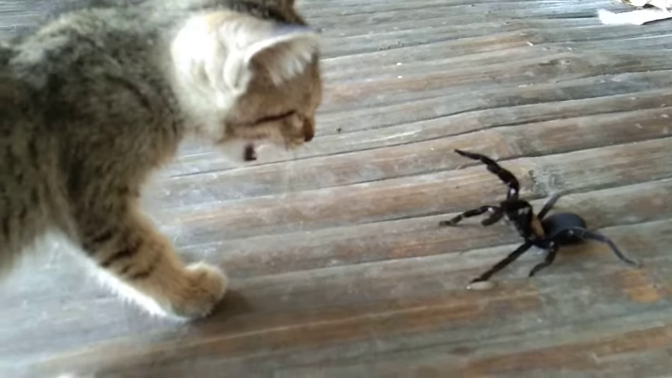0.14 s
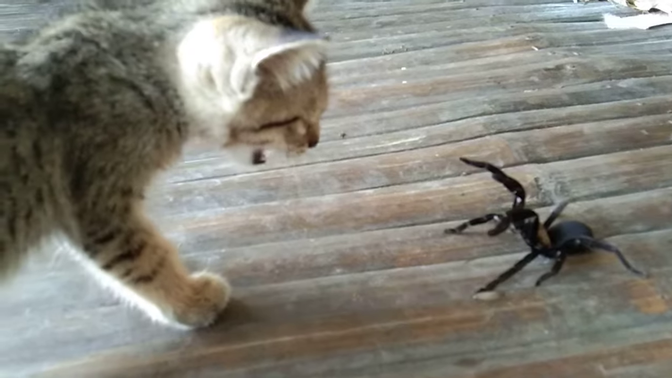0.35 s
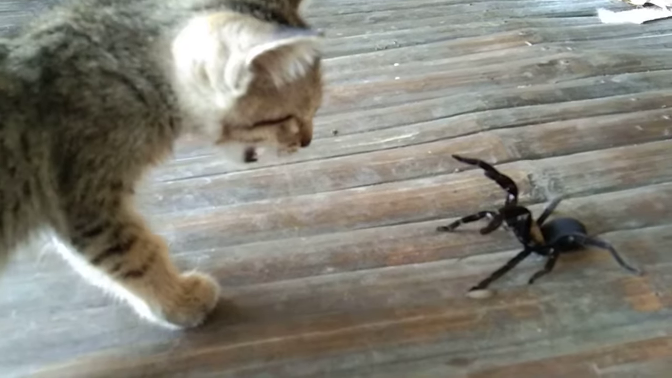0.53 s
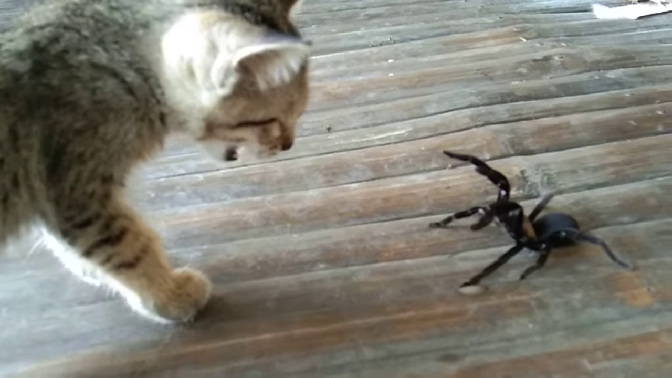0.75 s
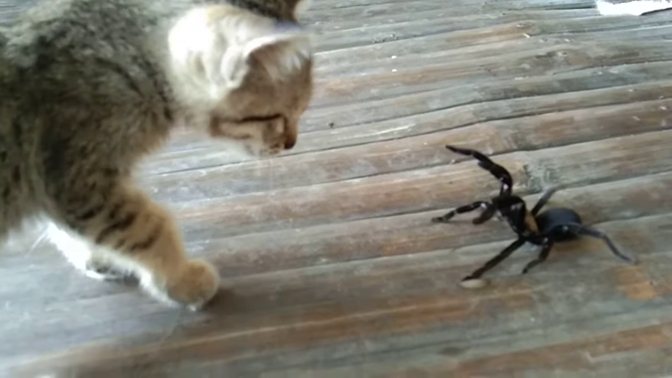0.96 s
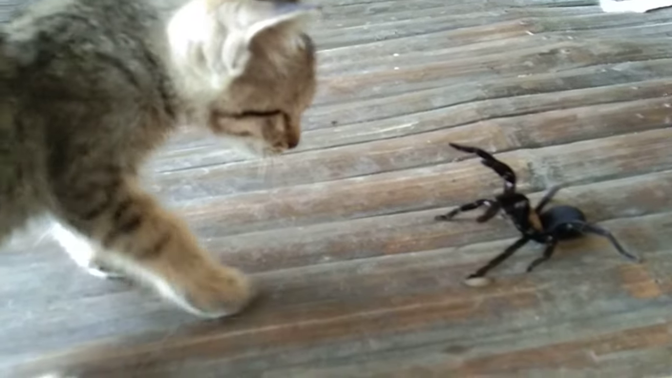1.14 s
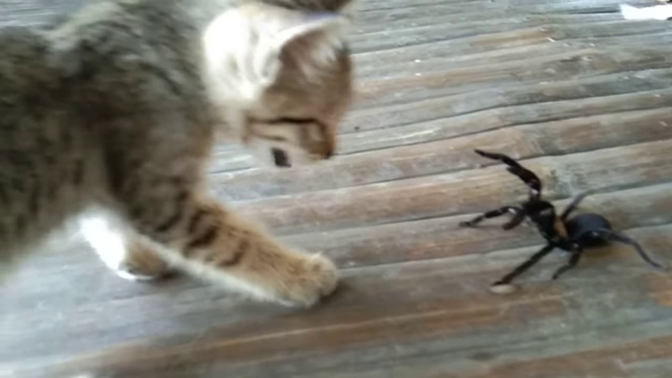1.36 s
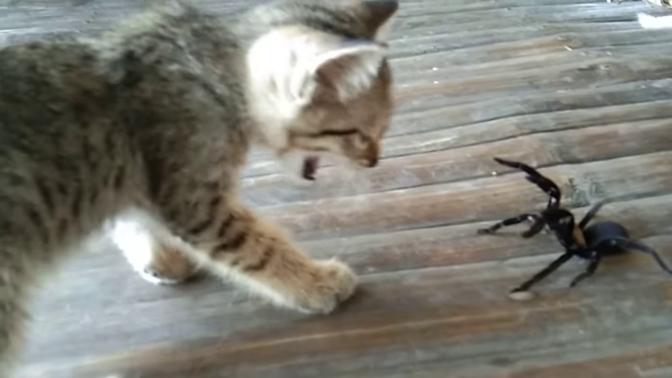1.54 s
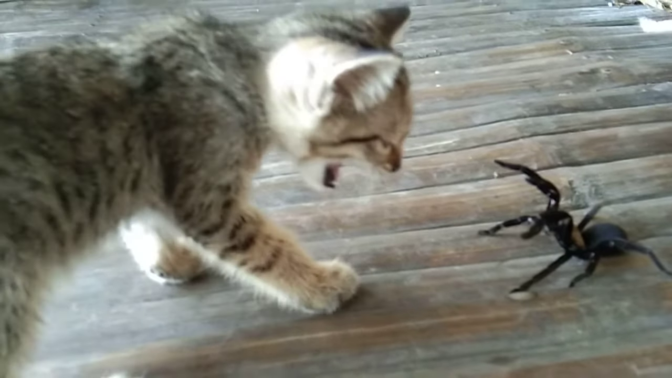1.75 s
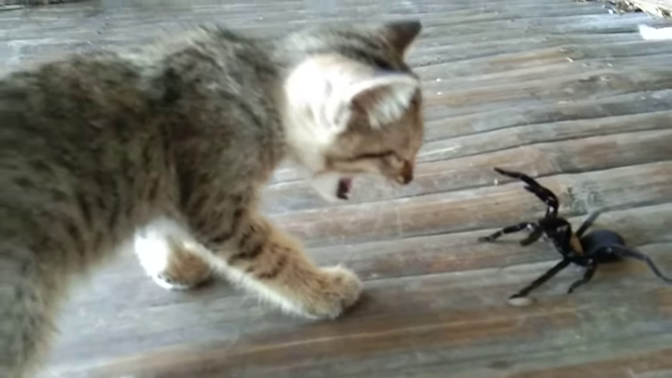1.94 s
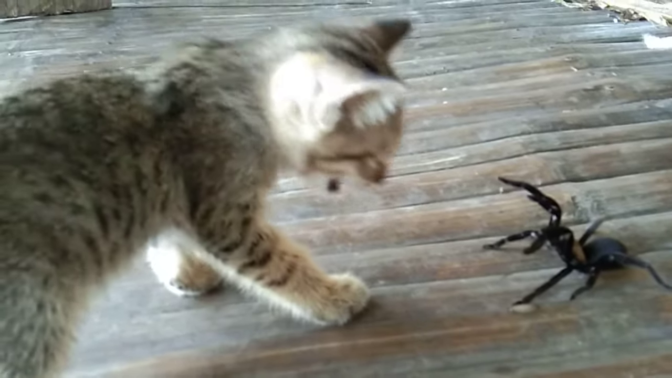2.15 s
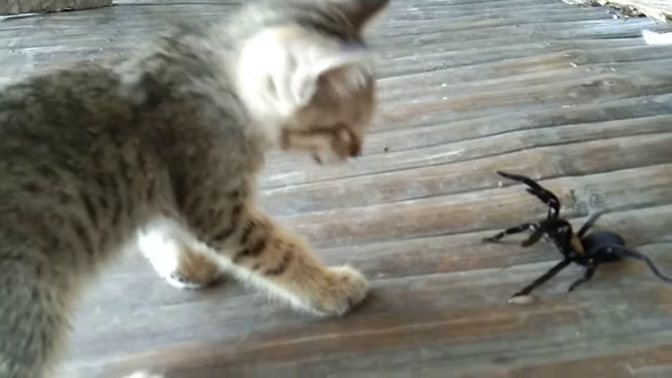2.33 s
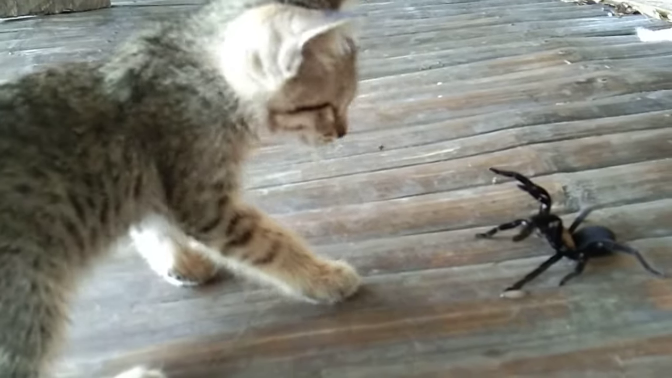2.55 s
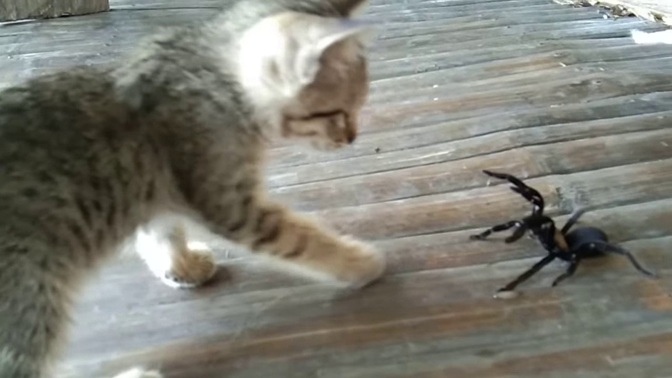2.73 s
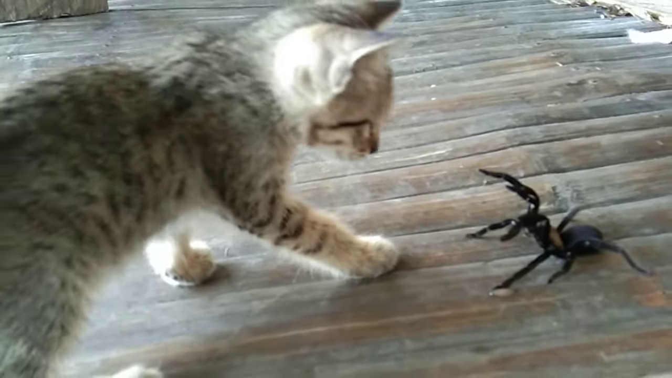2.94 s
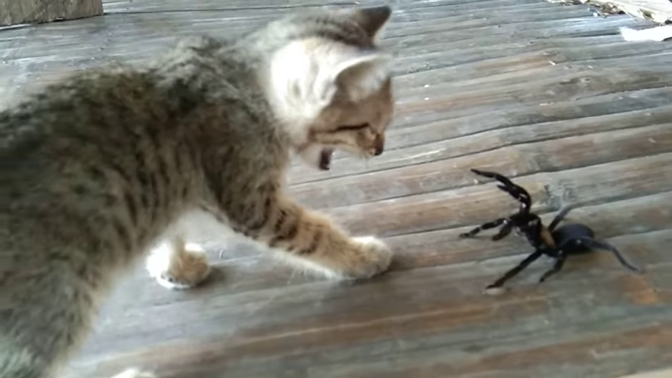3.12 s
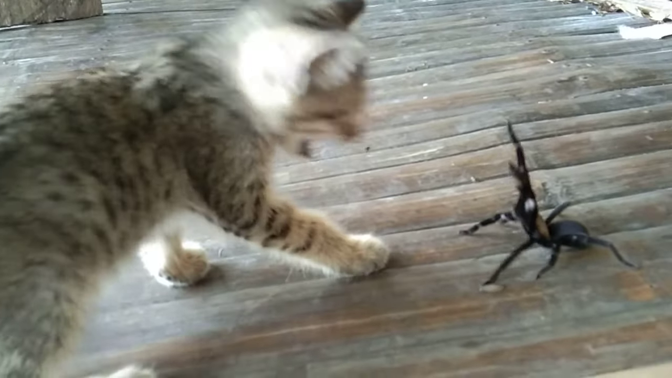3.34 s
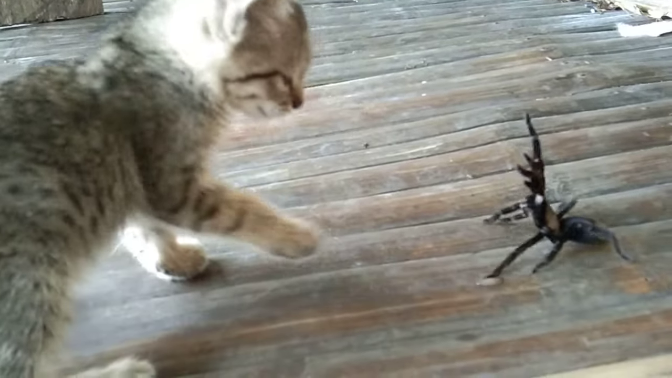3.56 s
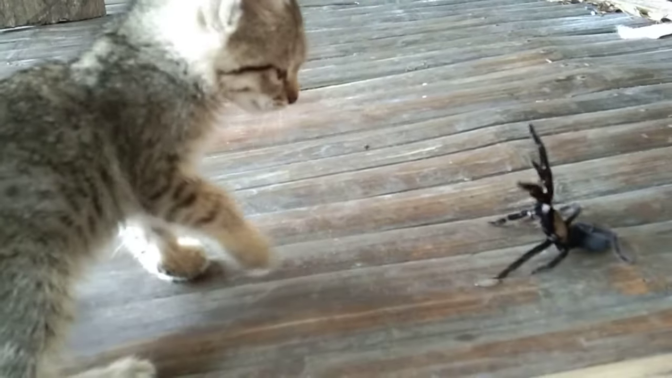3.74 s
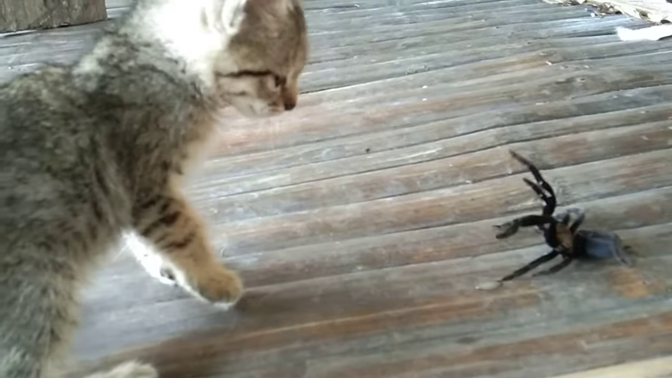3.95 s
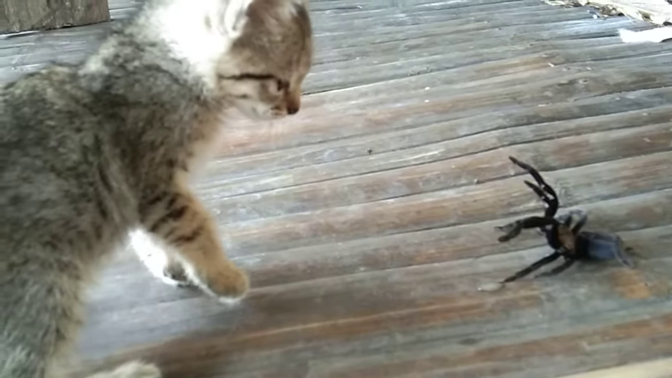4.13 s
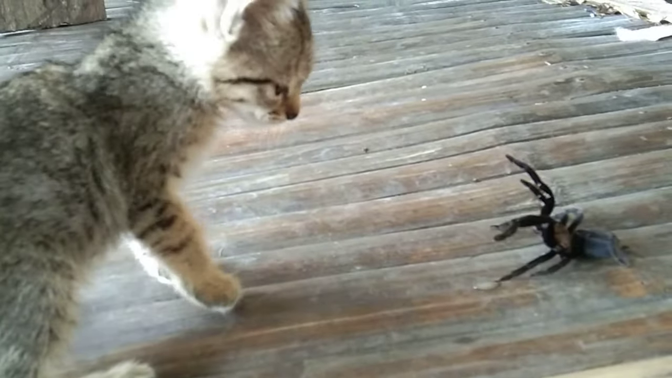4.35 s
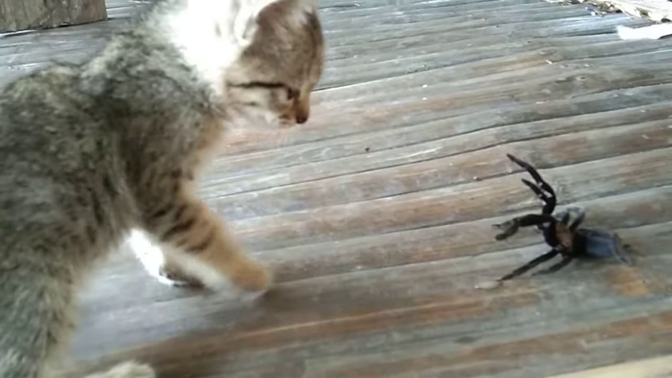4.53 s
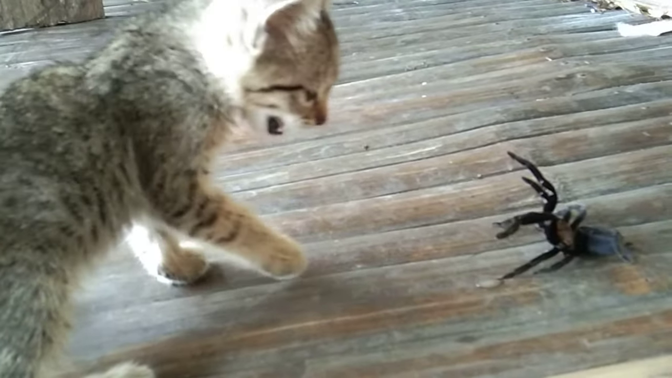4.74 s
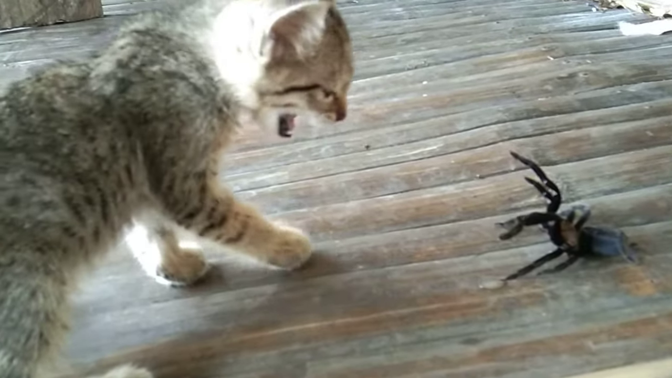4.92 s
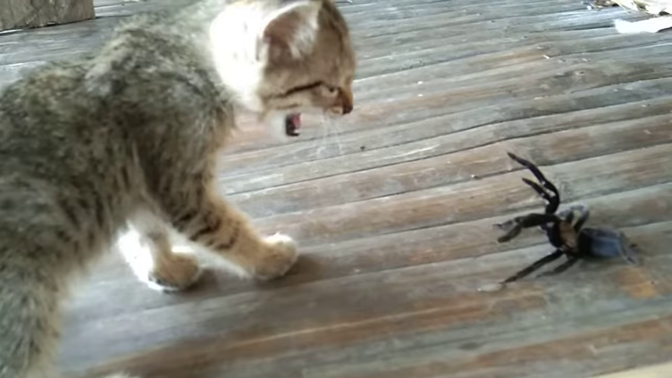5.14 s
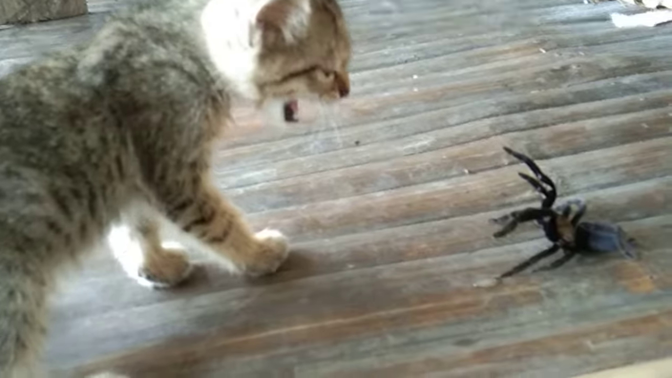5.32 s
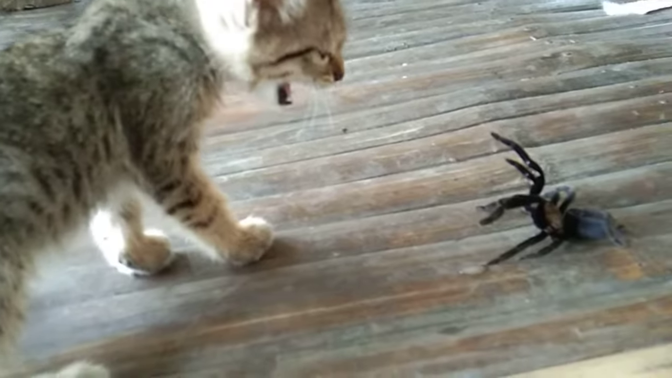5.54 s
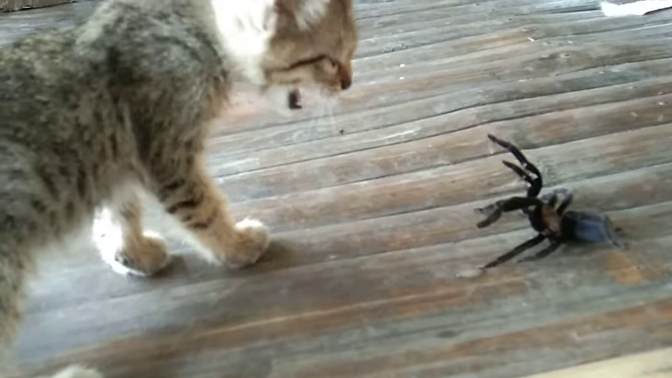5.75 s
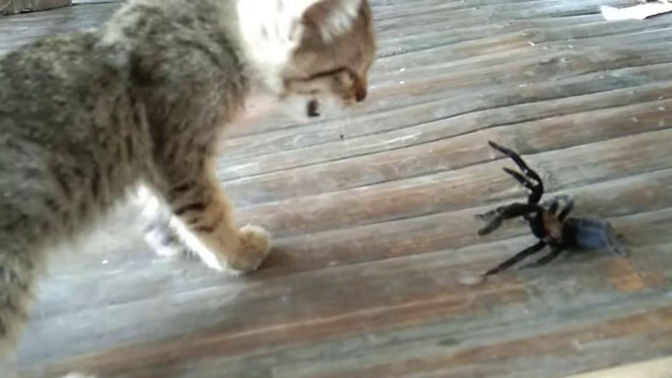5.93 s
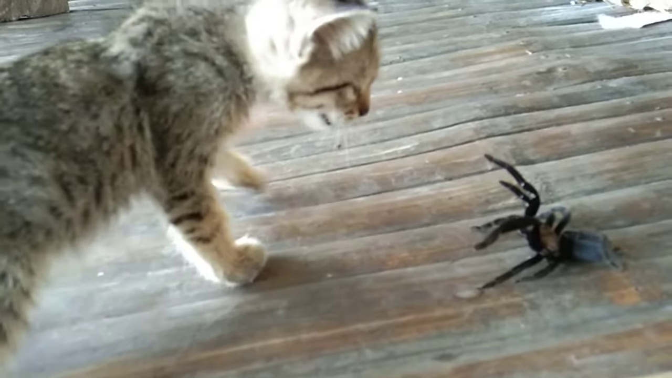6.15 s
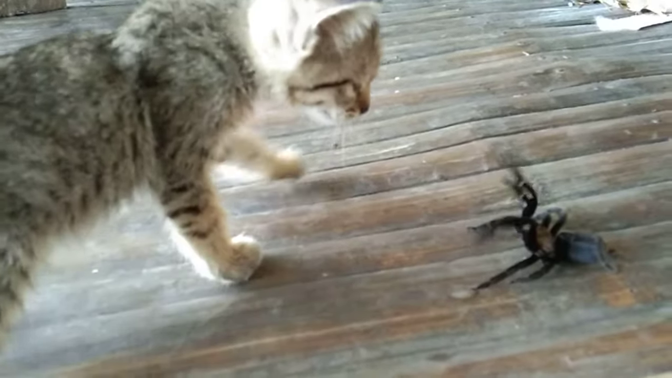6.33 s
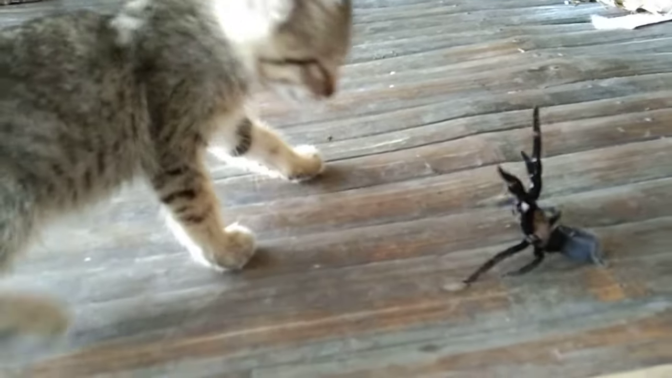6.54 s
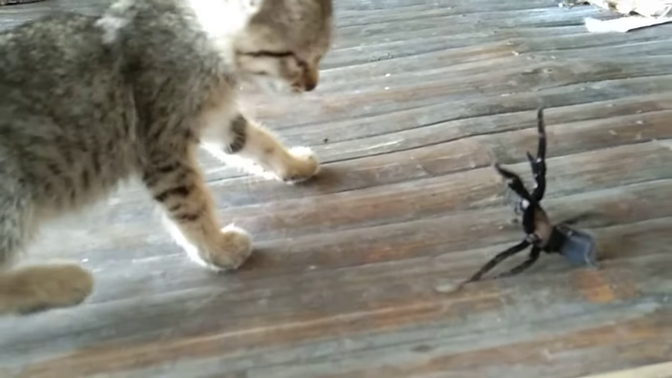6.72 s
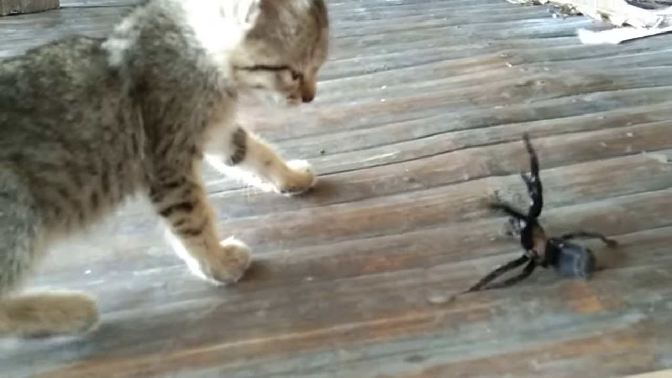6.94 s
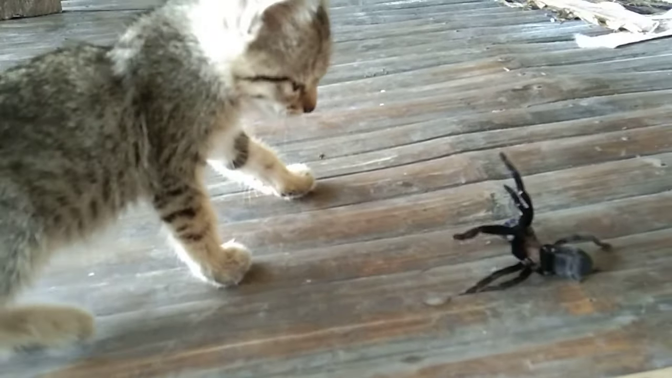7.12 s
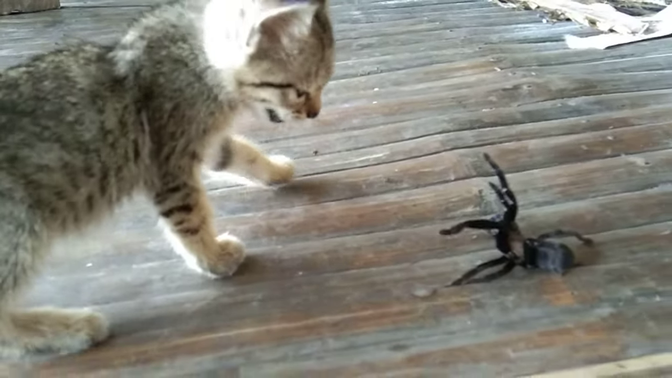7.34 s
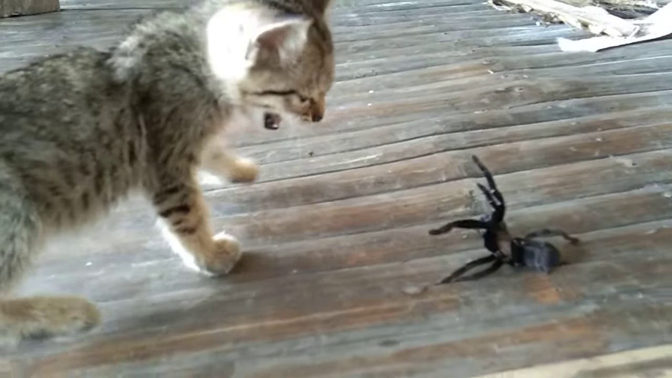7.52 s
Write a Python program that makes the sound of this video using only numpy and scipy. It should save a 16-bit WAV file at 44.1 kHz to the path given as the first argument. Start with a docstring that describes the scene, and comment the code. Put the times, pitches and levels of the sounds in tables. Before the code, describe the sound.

A kitten close by gives five high, insistent meows, some raspy, with soft paw bumps on wooden boards and faint distant birds outdoors.

```python
"""On a wooden deck outdoors, a kitten meows five times close by. Each meow glides in pitch, most rising then
falling, the first mostly falling, the last only rising; it rasps when pushed and mostly ends in a short break
to a lower register: harmonics of uneven vocal fold cycles, coloured by a throat resonance and a high ring,
plus hiss. Filtered noise bursts make paws on the boards and thin ticks. Far birds are gliding sine notes;
still air, a thin insect buzz and a low hum are steady shaped noise."""
import sys
import numpy as np
from scipy import signal
from scipy.fft import rfft
from scipy.io import wavfile
from scipy.ndimage import uniform_filter1d, map_coordinates

SR = 44100
rng = np.random.default_rng(int(sys.argv[2]) if len(sys.argv) > 2 else 0)


def to_wav(s):
    """Save 16-bit WAV."""
    ch = np.atleast_2d(s).T  # columns
    pcm = np.round(np.clip(ch, -1, 1) * 32767)  # PCM
    wavfile.write(sys.argv[1], SR, pcm.astype(np.int16))


N = 338688
TIME = np.arange(N) / SR
TOP_HZ = 15700  # top of the audible band here
MIDDLE_HZ = 720  # the kitten's middle pitch

# The five meows. Each row: start and end in seconds, chest level and ring level in dB at middle pitch,
# ring attack and ring release in seconds, throat resonance at middle pitch, ring and top edge in Hz.
MEOWS = [(0, 1.041, -37, -31.5, .002, .04, 3625, 6915, 13000),
         (1.446, 2.379, -35.5, -25, 0.014, 0.086, 3870, 6876, 15500),
         (3.111, 3.539, -39.5, -31.5, 0.016, 0.062, 3705, 7070, 15500),
         (4.685, 6.237, -37, -28.5, 0.066, 0.086, 3690, 6736, 13000),
         (7.354, 7.7, -41.5, -30.5, 0.11, 0.037, 3550, 6850, 14500)]
# Pitch glide of each meow, one list per meow. Each row: scene time in seconds, pitch in Hz.
PITCH_GLIDES = [
    [(0.0, 733), (0.014, 741.6), (0.212, 736), (0.498, 681), (0.62, 682.6), (0.694, 704), (0.778, 698),
     (0.798, 709), (0.858, 686.6), (0.964, 628), (1.025, 539)],
    [(1.458, 427), (1.468, 423), (1.498, 493), (1.54, 574), (1.648, 600), (1.74, 688), (1.864, 717.3),
     (1.908, 713.6), (2.154, 734), (2.226, 722.6), (2.312, 660.3), (2.365, 650.6)],
    [(3.118, 535), (3.152, 633), (3.17, 654), (3.196, 674), (3.242, 684), (3.332, 755), (3.408, 778.5),
     (3.46, 738.5), (3.528, 662)],
    [(4.69, 491), (4.702, 491), (4.724, 558), (4.754, 586), (4.826, 644), (4.916, 660.3), (5.03, 736.5),
     (5.044, 754), (5.074, 757), (5.368, 723.7), (5.702, 747.8), (5.714, 728.6), (5.852, 712.3),
     (6.006, 673.3), (6.134, 635.6), (6.225, 586.5)],
    [(7.366, 482), (7.376, 535), (7.392, 553), (7.43, 616), (7.466, 641.3), (7.552, 655), (7.68, 745)],
]
# Throat resonance as the mouth opens and shuts, one list per meow.
# Each row: scene time in seconds, level in dB.
MOUTH_OPENINGS = [
    [(0.0, -20), (0.464, -24.5), (0.476, -26.5), (0.624, -25.5), (0.666, -19.5), (0.874, -21), (0.938, -25),
     (1.025, -43.5)],
    [(1.458, -58), (1.472, -46.5), (1.532, -35.5), (1.54, -39), (1.662, -31), (1.724, -23), (2.158, -17),
     (2.28, -21), (2.365, -35)],
    [(3.118, -58), (3.126, -46.5), (3.194, -30), (3.306, -27), (3.316, -22), (3.446, -21.5), (3.486, -29.5),
     (3.528, -51)],
    [(4.69, -97), (4.744, -47), (5.01, -34), (5.03, -26), (5.228, -29), (5.24, -26), (5.462, -28),
     (5.604, -20), (5.702, -19.5), (5.732, -30), (5.898, -19.5), (6.04, -30.5), (6.074, -27.5),
     (6.225, -38)],
    [(7.366, -90), (7.454, -51.5), (7.586, -50), (7.596, -42), (7.68, -37)],
]
# The voice breaks downward as a meow ends: the pitch sags, in most breaks jumps back up, then sinks;
# the first only sinks. Each row: start and length in seconds, pitch in Hz, time until the turn in seconds,
# turn pitch and end pitch in Hz, starting levels of chest, throat and ring in dB, throat resonance in Hz.
BREAKS = [(1.028, 0.05, 468.5, 0.021, 407, 380, -35, -32.5, -41, 3920),
          (2.374, 0.11, 567, .047, 601.6, 444, -30.5, -33.5, -40.5, 3100),
          (3.533, .182, 586.5, .036, 623, 507, -35.5, -57.5, -54, 3470),
          (6.229, 0.045, 453.5, 0.014, 523, 483, -34.5, -33, -31.5, 3500)]


def kitten():
    """Gliding calls, then their rougher low endings with broader resonances."""
    clear = dict(jitter=.0032, flutter_db=2.4, hiss_db=2)
    open_mouth = dict(throat_width_hz=520, ring_width_hz=1250,
                      fundamental_db=-3.5, fundamental_db_per_octave=11.5)
    rough = dict(jitter=.009, flutter_db=2.6, hiss_db=8)
    closing_mouth = dict(throat_width_hz=2300, ring_width_hz=1700,
                         fundamental_db=-3.5, fundamental_db_per_octave=1)
    meows = zip(MEOWS, PITCH_GLIDES, MOUTH_OPENINGS)
    calls = sum(meow(call(*one), **clear, **open_mouth) for one in meows)
    endings = sum(meow(voice_break(row), **rough, **closing_mouth) for row in BREAKS)
    return calls + endings


CHEST_DB_PER_OCTAVE, RING_DB_PER_OCTAVE = 16.5, 15.5  # pushing harder raises pitch and level together
THROAT_HZ_PER_OCTAVE = 700  # and opens the mouth wider
THROAT_SAG_HZ = -350  # the jaw relaxes from start to end of a meow
CHEST_SWELL_DB = 3.5  # the low harmonics grow from start to end of a meow
CHEST_OPENING_DB, CHEST_ATTACK_S = -4, .012
RING_OPENING_DB, RING_CLOSING_DB = -29, -14  # the ring while the mouth is still, or again, nearly shut
RING_PER_THROAT = 0.2  # share of the throat's level changes that the ring follows


def call(row, glide, mouth):
    """Controls of one meow: chest and throat tuning follow pitch, the ring follows pitch and mouth."""
    start, end, chest_db, ring_db, attack_s, release_s, throat_hz, ring_hz, top_hz = row
    t = TIME[(TIME >= start) & (TIME < end)]
    pitch = np.interp(t, *np.transpose(glide))
    effort = np.log2(pitch / MIDDLE_HZ)  # octaves
    progress = (t - start) / (end - start) - .5
    throat = np.interp(t, *np.transpose(mouth))

    chest = chest_db + CHEST_DB_PER_OCTAVE * effort + CHEST_SWELL_DB * progress
    chest += CHEST_OPENING_DB * np.exp((start - t) / CHEST_ATTACK_S)

    ring = ring_db + RING_DB_PER_OCTAVE * effort
    ring += RING_PER_THROAT * (throat - np.median(throat))
    ring += RING_OPENING_DB * np.exp((start - t) / attack_s)
    ring += RING_CLOSING_DB * np.exp((t - end) / release_s)

    centre_hz = throat_hz + THROAT_HZ_PER_OCTAVE * effort + THROAT_SAG_HZ * progress
    return t, pitch, chest, throat, ring, centre_hz, ring_hz, top_hz, *rasp_at(t)


# Bouts of rasp. Each row: start and length in seconds, added share of cycles that slap shut hard (0-1),
# extra hiss in dB.
RASP_BOUTS = [(0, .06, .2, 1), (.165, .155, .28, 3), (.345, .03, .25, 2), (.5, .25, .17, 2),
              (.758, .02, .5, 6), (.78, .21, .1, 2), (1.46, .07, .1, 5), (1.53, .11, .5, 1),
              (1.79, .07, .14, 1), (1.91, .36, .3, 0), (3.26, .24, .03, 3), (5.7, .21, .17, 3),
              (5.95, .28, .03, 4)]
CALM_RASP, RASP_SLEW_S = .006, .02  # share of hard closures in a calm voice; edge of a bout


def rasp_at(t):
    """Share of hard closures and extra hiss in dB: a calm voice, with bouts of rasp."""
    rasp, hoarse_db = np.full(len(t), CALM_RASP), np.zeros(len(t))
    for start, length, often, db in RASP_BOUTS:
        inside_s = np.minimum(t - start, start + length - t)
        bout = np.clip(.5 + inside_s / RASP_SLEW_S, 0, 1)
        rasp = rasp + often * bout
        hoarse_db = hoarse_db + db * bout
    return rasp, hoarse_db


BREAK_SAG, TURN_S, BREAK_RELEASE_S = .93, 0.011, .014  # pitch ratio before the turn; its length; final fade
# fades over the length of a break
BREAK_CHEST_FADE_DB, BREAK_THROAT_FADE_DB, BREAK_RING_FADE_DB = -9.5, -13, -8
BREAK_RING_HZ, BREAK_TOP_HZ, BREAK_RASP = 6850, 13000, .12


def voice_break(row):
    """Controls of a low ending: pitch sags, mostly jumps back up, then sinks while the resonances fade."""
    start, length, hz, turn_s, turn_hz, end_hz, chest_db, throat_db, ring_db, throat_hz = row
    t = TIME[(TIME >= start) & (TIME < start + length)]
    age = t - start
    corners_s = [0, turn_s, turn_s + TURN_S, length]
    pitch = np.interp(age, corners_s, [hz, hz * BREAK_SAG, turn_hz, end_hz])
    release_db = -20 * np.clip(1 - (length - age) / BREAK_RELEASE_S, 0, 1)
    fades = ((chest_db, BREAK_CHEST_FADE_DB),
             (throat_db, BREAK_THROAT_FADE_DB),
             (ring_db, BREAK_RING_FADE_DB))
    levels = [db + fade_db * age / length + release_db for db, fade_db in fades]
    return t, pitch, *levels, throat_hz, BREAK_RING_HZ, BREAK_TOP_HZ, np.full(len(t), BREAK_RASP), 0


# Broad colour of the voice around its two sharp resonances: chest below, edge above.
# Each row: frequency in Hz, relative level in dB.
CHEST_COLOUR = [(350, 5.5), (550, 1.5), (740, -5), (1100, 0), (1500, -2.5), (2200, 1), (2900, 2),
                (3600, -23), (5000, -24.5), (8000, -45.5)]
EDGE_COLOUR = [(3500, -50), (5000, -9), (5900, -13), (7800, -32.5), (8500, -29.5), (9400, -18.5),
               (10500, -31.5), (12000, -36.5), (13200, -31.5), (14200, -43), (15500, -49)]
RING_HZ = 6850  # the high ring's usual place; the edge colour shifts with it
TOP_DB_PER_HZ = -.012  # fall of the edge harmonics above the top edge
VOICE_FADE_S = .0044  # at both ends of a meow or break


def meow(controls, jitter, flutter_db, hiss_db, throat_width_hz, ring_width_hz,
         fundamental_db, fundamental_db_per_octave):
    """Vocal fold harmonics through a moving throat resonance and a high ring, with uneven closures and hiss."""
    t, pitch, chest_db, throat_db, ring_db, throat_hz, ring_hz, top_hz, rasp, hoarse_db = controls
    span = (TIME >= t[0]) & (TIME <= t[-1])
    rasp = np.clip(rasp, 0, .5)
    pitch = pitch * (1 + jitter * (1 + 3 * rasp) * walk(t, 300) + .0023 * walk(t, 80))
    cycles = np.cumsum(pitch) / SR
    k = np.arange(1, 29)[:, None]  # harmonic numbers
    hz = k * pitch

    throat = resonance(hz, throat_hz, throat_width_hz)
    throat = throat * resonance(hz, throat_hz, 1600) * resonance(hz, throat_hz, 3000)
    ring = resonance(hz, ring_hz, ring_width_hz) ** 2 * resonance(hz, ring_hz, 2400) ** 2

    # a nearly shut mouth weakens the throat resonance and dulls the low harmonics too
    shut_db = np.minimum(throat_db - chest_db - 7.0, 0)
    dulling_db = .5 * shut_db * np.log2(np.maximum(hz / 1100, 1))
    root_db = fundamental_db + fundamental_db_per_octave * np.log2(pitch / MIDDLE_HZ)
    chest = colour(hz, CHEST_COLOUR) * undb(dulling_db + root_db * (k == 1))

    # each harmonic wavers as the head moves above the reflecting boards
    waver = undb(flutter_db * np.array([walk(t, 22) for _ in k])) * (hz < TOP_HZ)
    phase = 2 * np.pi * k * cycles

    low_gains = np.hypot(share(chest) * undb(chest_db), share(throat) * undb(throat_db))
    low = np.sum(low_gains * waver * np.sin(phase + np.angle(throat)), axis=0)
    high = undb(ring_db) * np.sum(share(ring) * waver * np.sin(phase + np.angle(ring)), axis=0)
    treble = colour(hz * RING_HZ / ring_hz, EDGE_COLOUR) * undb(TOP_DB_PER_HZ * np.maximum(hz - top_hz, 0))
    edge = undb(ring_db) * np.sum(treble * waver * np.cos(phase + np.angle(ring)), axis=0)

    # hard closures strike the high ring much more than the throat
    force = closures(cycles, rasp, slap=3.2)
    voice = low + high * force + edge * np.sqrt(force)
    voice += .42 * band(low * (force - 1), 3950, 800)

    # turbulence passes once a cycle and grows with the rasp
    air = rng.standard_normal(len(t)) * (1 - np.cos(2 * np.pi * cycles))
    air = air * force * undb(hiss_db) * np.sqrt(rasp + .025)
    voice += turbulence(air, chest_db, throat_db, ring_db, ring_hz, hoarse_db)

    out = np.zeros(N)
    out[span] = voice * np.clip(np.minimum(t - t[0], t[-1] - t) / VOICE_FADE_S, 0, 1)
    return out


def closures(cycles, rasp, slap):
    """Force of each cycle, rms near 1. No two hard closures adjoin, so heavy rasp tends to half the pitch."""
    cycle = cycles.astype(int)
    often = rasp[np.searchsorted(cycle, np.arange(cycle[-1] + 1))]
    hard = rng.random(len(often)) < often / (1 - often)
    for i in range(1, len(hard)):
        hard[i] &= not hard[i - 1]
    extra = slap * np.sqrt(often)
    force = 1 + hard * extra * rng.uniform(.75, 1.25, len(hard))
    force = force / np.sqrt(1 + often * extra * (2 + extra))
    return uniform_filter1d(force[cycle], size=14)  # rounds the steps between cycles


# hiss in each part of the voice, added to that part's level
RING_HISS_DB, TREBLE_HISS_DB, THROAT_HISS_DB, CHEST_HISS_DB = -0.5, -18.5, -11.5, -18.5


def turbulence(air, chest_db, throat_db, ring_db, ring_hz, hoarse_db):
    """Pulsing breath noise, coloured by ring, treble, throat and chest bands that follow the voice levels."""
    ring = undb(RING_HISS_DB) * band(air, ring_hz, 950)
    treble = undb(TREBLE_HISS_DB) * band(air, 7500, 10000, order=7)
    throat = band(air, 5100, 800) * undb(throat_db + THROAT_HISS_DB)
    chest = band(air, 2200, 1900, order=3) * undb(chest_db + CHEST_HISS_DB + hoarse_db)
    return (ring + treble) * undb(ring_db + hoarse_db) + throat + chest


def resonance(hz, centre_hz, width_hz):
    """Complex response of one resonance."""
    return 1 / (1 + 1j * (hz / centre_hz - centre_hz / hz) * centre_hz / width_hz)


def share(gains):
    """Scale harmonic amplitudes so that together they have rms 1."""
    return np.abs(gains) / np.sqrt(np.sum(np.abs(gains) ** 2, axis=0) / 2)


# Paws on the boards. Each row: time in seconds, deep thud and woody knock, both in dB before filter and gain.
PAW_STEPS = [(.2, -73, -60), (.48, -57.5, -62), (.6, -69.5, -58.5), (2.7, -51, -60.5), (4.24, -70, -54),
             (5.3, -44.5, -56.5), (5.5, -53, -58), (6.44, -52, -69.5), (6.56, -55, -63), (6.69, -53, -72)]


def paws():
    """Paws bump the boards: dying noise puffs through a deep band and a woody band."""
    thuds = bursts([(s, db) for s, db, _ in PAW_STEPS], decay_s=0.014)
    knocks = bursts([(s, db) for s, _, db in PAW_STEPS], decay_s=0.1)
    return undb(27.5) * band(thuds, 70, 49) + undb(7.5) * band(knocks, 240, 120)


# Thin high ticks. Each row: time in seconds, level in dB before filter and gain.
TICKS = [(3.0993, -39), (4.1861, -46), (4.249, -44), (4.3116, -49), (4.675, -45.5), (6.5944, -45.5),
         (6.6149, -48.5), (7.3526, -47)]


def ticks():
    """Very short noise puffs through a narrow high band."""
    return undb(6) * band(bursts(TICKS, decay_s=0.0027), 7150, 850, order=3)


def bursts(rows, decay_s):
    """A short dying puff of noise for each event."""
    envelope = sum(undb(db) * (TIME >= s) * np.exp(-np.abs(TIME - s) / decay_s) for s, db in rows)
    return rng.standard_normal(N) * envelope


# The clearest far birds, then soft low hoots in the distance. Each row: start and length in seconds,
# start pitch and end pitch in Hz, peak level in dB before the far mix.
BIRD_WHISTLES = [(1.1, 0.082, 3080, 3060, -61.5), (1.345, 0.088, 4040, 4040, -55.5),
                 (2.84, 0.064, 3820, 3760, -61), (2.87, .12, 4435, 4260, -54.5),
                 (3.77, 0.083, 2320, 3516, -59), (3.82, 0.049, 3490, 3820, -51),
                 (6.33, 0.042, 3840, 2867, -56.5), (6.43, .088, 3620, 4000, -52.5),
                 (6.66, 0.11, 3650, 3910, -61), (6.97, 0.089, 3486, 4030, -55.5),
                 (7.07, 0.026, 2180, 1940, -66.5), (7.16, 0.064, 3424, 4100, -54),
                 (7.25, 0.077, 4100, 4560, -65.5)]
BIRD_HOOTS = [(0, 0.19, 442.5, 419, -54.5), (.4, 0.21, 393.4, 415.5, -61), (1.05, 0.3, 452.5, 389.5, -61),
              (2.72, 0.039, 498, 607, -65.5), (4.53, 0.078, 436, 393.3, -57.5),
              (6.88, 0.074, 514, 670, -72)]


def far_birds():
    """Clear whistles, a faint random chorus and less steady low hoots."""
    high = whistles(BIRD_WHISTLES + chorus(count=16), waver=.016)
    return high + whistles(BIRD_HOOTS, waver=.06)


def whistles(rows, waver):
    """Near-sine notes that glide and swell."""
    out = np.zeros(N)
    for start, length, from_hz, to_hz, db in rows:
        span = (TIME >= start) & (TIME < start + length)
        u = (TIME[span] - start) / length
        hz = (from_hz + (to_hz - from_hz) * u) * (1 + waver * walk(TIME[span], 120))
        out[span] += undb(db) * np.sin(np.pi * u) * np.sin(2 * np.pi * np.cumsum(hz) / SR)
    return out


CHORUS_HZ, CHORUS_OCTAVES, CHORUS_GLIDE = 3500, .8, .18  # centre; reach either way; largest glide as a share
CHORUS_NOTE_S, CHORUS_DB = .06, -74  # level before the far mix


def chorus(count):
    """Faint bird notes at random moments and pitches."""
    rows = []
    for when, height, glide in rng.uniform(-1, 1, (count, 3)):
        start = (when + 1) / 2 * (TIME[-1] - CHORUS_NOTE_S)
        hz = CHORUS_HZ * 2 ** (CHORUS_OCTAVES * height)
        rows.append((start, CHORUS_NOTE_S, hz, hz * (1 + CHORUS_GLIDE * glide), CHORUS_DB))
    return rows


# Colour of the outdoor air. Each row: frequency in Hz, relative level in dB per Hz.
AIR_COLOUR = [(25, -24.5), (50, -9.5), (80, -7), (130, -11.5), (250, -22.5), (500, -17), (1000, -26.5),
              (2500, -32.5), (3800, -25), (5000, -26), (7000, -30), (10000, -34.5), (15000, -46.5)]


def outdoors():
    """Still air, a low hum and a steady insect buzz: one broad and two narrow bands of noise."""
    air = undb(-80 + 0.72 * walk(TIME, 2.3)) * noise(AIR_COLOUR)
    hum = undb(-79) * unit(band(rng.standard_normal(N), 80, 3.8))
    insects = undb(-73.5 + 0.45 * walk(TIME, 7.2)) * unit(band(rng.standard_normal(N), 11080, 220))
    return air + hum + insects


def echo(x, t60_s, treble_t60_s, delay_s):
    """Diffuse reflections that die sooner in the treble: decaying noise as an impulse response."""
    t = TIME[:SR]
    low, high = rng.standard_normal((2, SR))
    tail = band(low, 2400, 4200) * undb(-60 * t / t60_s)
    tail += band(high, 8500, 8000) * undb(-60 * t / treble_t60_s)
    tail *= t > delay_s
    return signal.fftconvolve(x, tail / np.sqrt(np.sum(tail ** 2)))[:N]


def undb(db):
    """Amplitude of a level in dB."""
    return 10 ** (np.asarray(db) / 20)


def unit(x):
    """Scale to rms 1."""
    return x / np.sqrt(np.mean(x ** 2))


def colour(hz, points):
    """Gain of a (Hz, dB) spectrum at the given frequencies."""
    f, db = np.transpose(points)
    return undb(np.interp(np.log(hz + 1), np.log(f), db))


def noise(points):
    """Noise of rms 1 with a given spectrum."""
    hz = np.arange(N // 2 + 1) * SR / N
    return unit(np.fft.irfft(rfft(rng.standard_normal(N)) * colour(hz, points), N))


def band(x, hz, width_hz, order=2):
    """Band-pass around a centre."""
    edges = [max(hz - width_hz / 2, 10), hz + width_hz / 2]
    return signal.sosfilt(signal.butter(order, edges, "band", fs=SR, output="sos"), x)


def walk(t, rate):
    """Smooth chance with a spread near 1, from random knots at a rate per second."""
    knots = rng.standard_normal(int((t[-1] - t[0]) * rate) + 2)
    return map_coordinates(knots, [(t - t[0]) * rate], order=2, mode="nearest")


def scene():
    """The near kitten and the distant garden, alike in both ears."""
    near = kitten() + ticks() + paws()
    far = far_birds()
    porch = undb(-21) * echo(near, t60_s=.42, treble_t60_s=.28, delay_s=.006)
    trees = undb(-6.0) * echo(far, t60_s=.8, treble_t60_s=0.067, delay_s=0.009)
    mono = near + porch + undb(-2) * far + trees + outdoors()
    return np.array([mono, mono])


def record(dry):
    """A steep low-pass cuts the top."""
    return signal.sosfilt(signal.ellip(8, .2, 70, TOP_HZ, fs=SR, output="sos"), dry)


dry = scene()
out = record(dry)
to_wav(out)
```